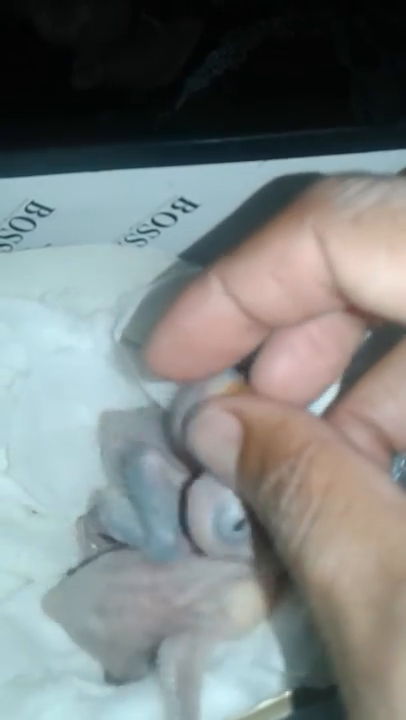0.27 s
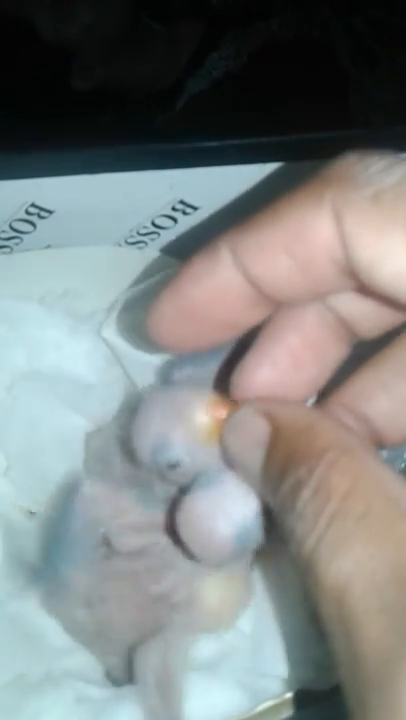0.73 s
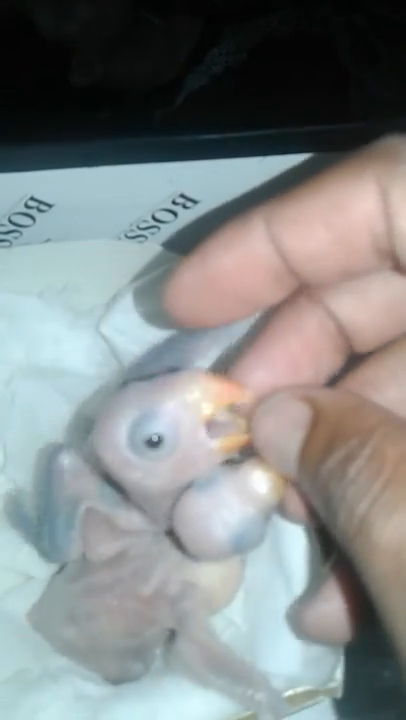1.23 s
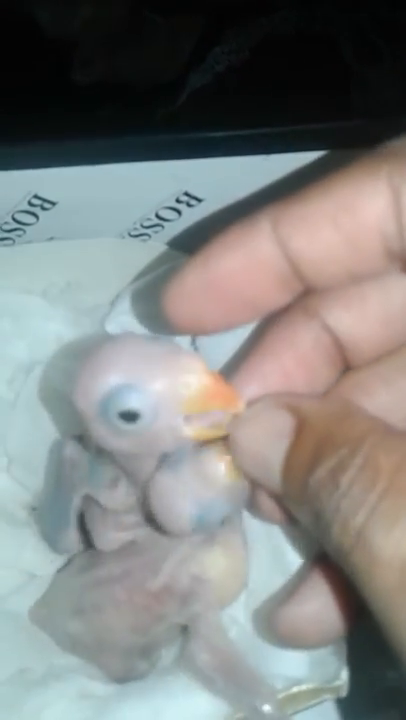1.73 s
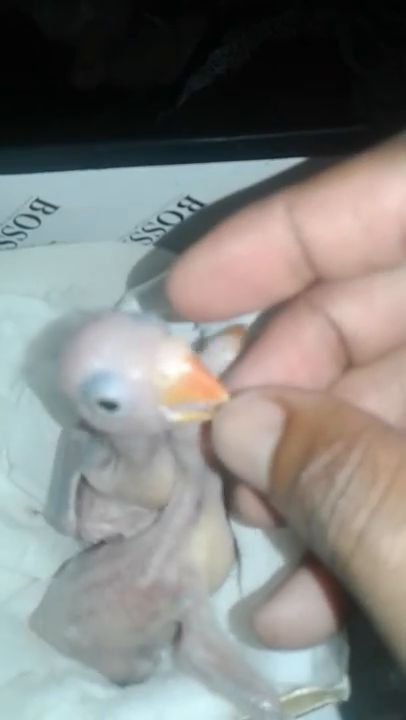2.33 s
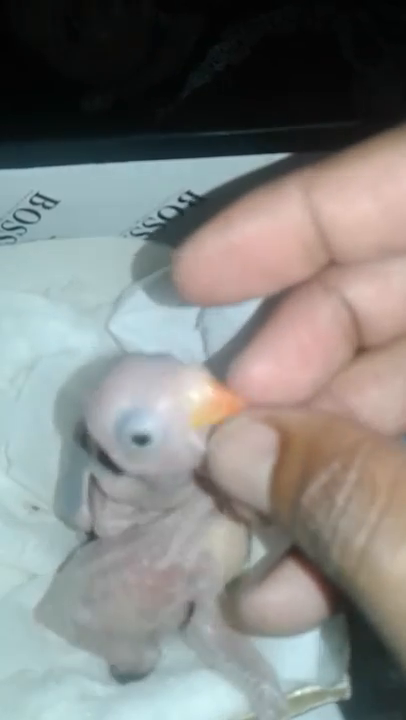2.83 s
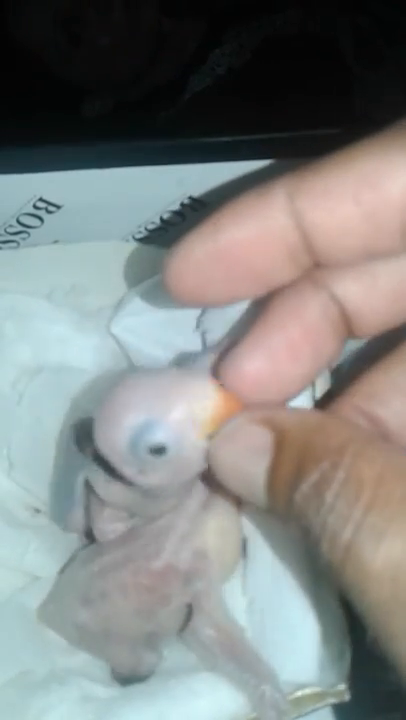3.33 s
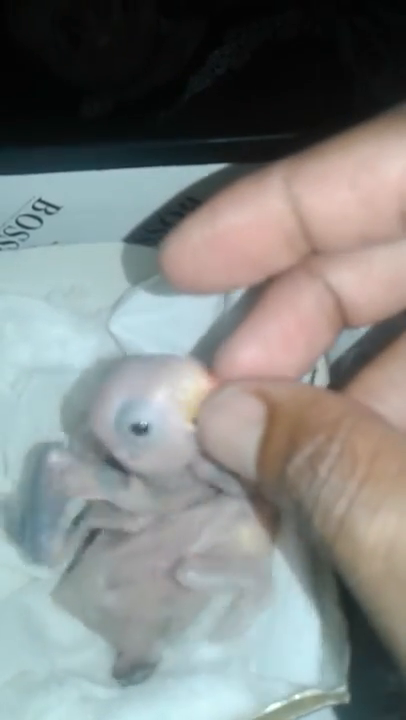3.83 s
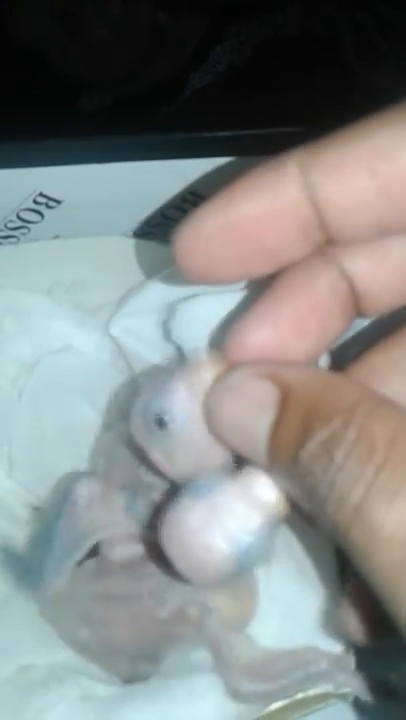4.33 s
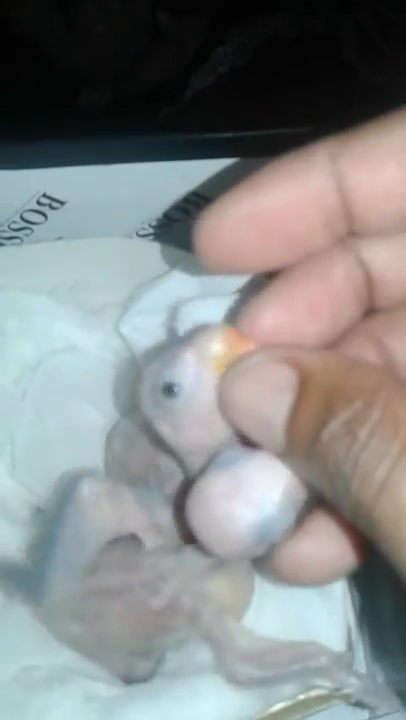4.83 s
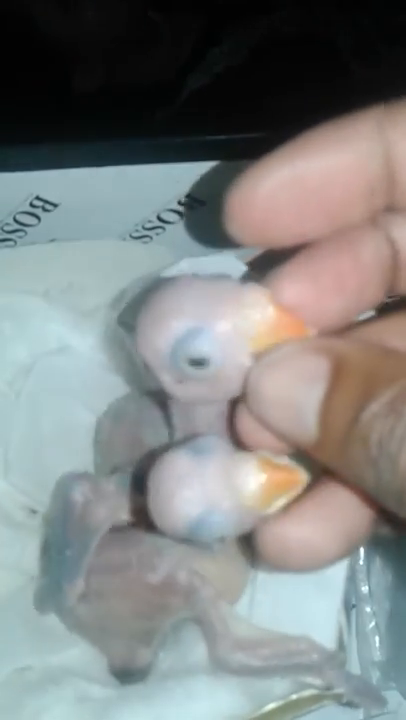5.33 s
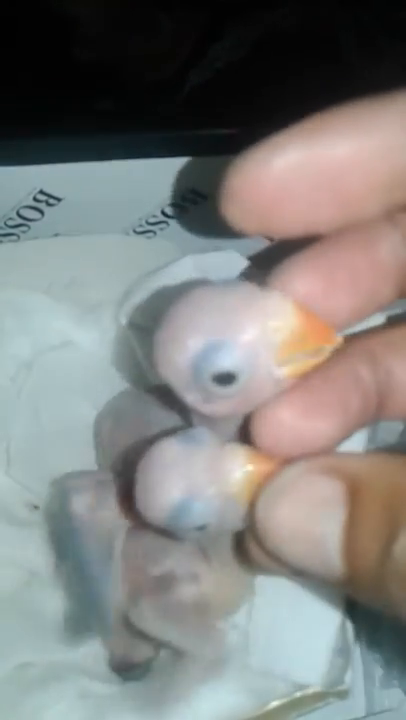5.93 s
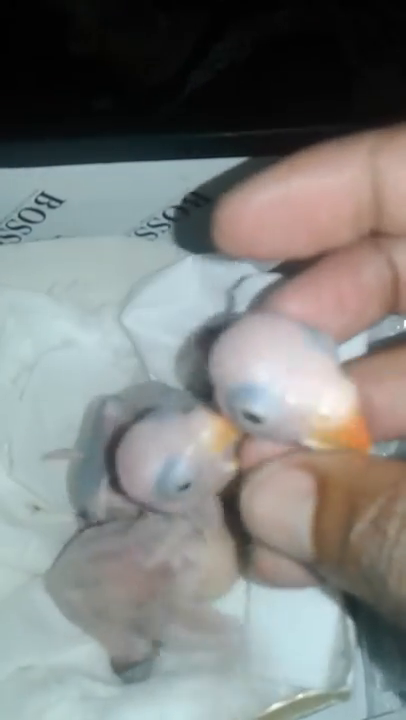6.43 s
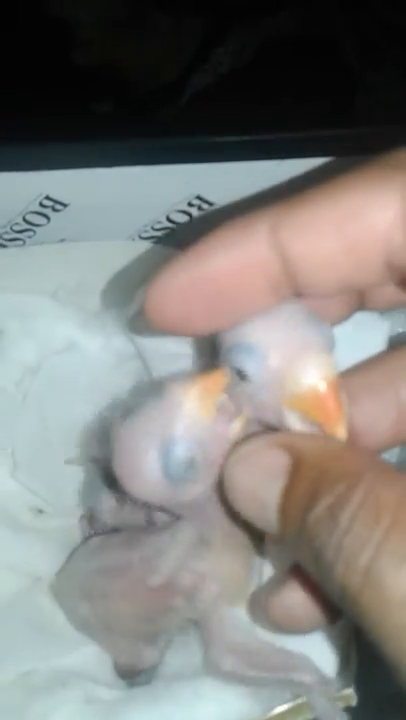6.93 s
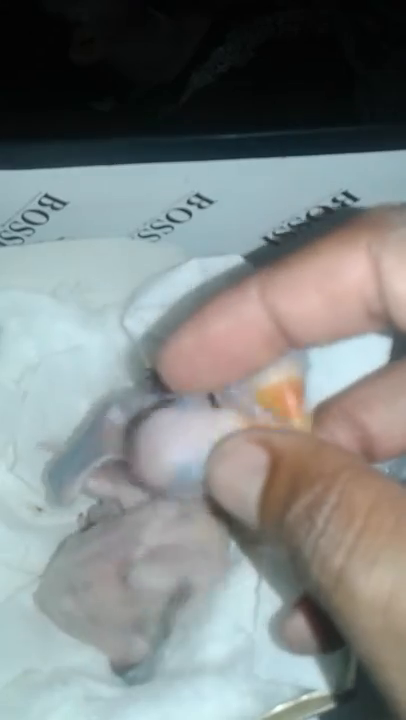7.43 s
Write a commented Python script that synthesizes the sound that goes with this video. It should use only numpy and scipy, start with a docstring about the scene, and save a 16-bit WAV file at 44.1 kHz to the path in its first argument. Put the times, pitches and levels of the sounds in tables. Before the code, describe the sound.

In a room with the low, steady drone and thin hiss of a fan, a baby bird chirps quickly and regularly right by a phone microphone. The chirps are brief and scratchy, dipping a little in loudness midway and sinking slightly in pitch toward the end. A few soft, low handling thumps fall underneath. The chirping stops about a second before the end, leaving only the fan.

```python
"""Parrot chick begging

A chick chirps about six times a second, close to a phone. Each chirp is a click train from the syrinx,
coloured by tract, nest and microphone: the rate arches up and over, then breaks into a slow uneven creak.
A fan drones and hisses in the room; the hand holding the phone bumps it softly."""
import sys
import numpy as np
from scipy import signal
from scipy.fft import rfft, irfft
from scipy.io import wavfile
from scipy.ndimage import uniform_filter1d, map_coordinates

SR = 44100
rng = np.random.default_rng(int(sys.argv[2]) if len(sys.argv) > 2 else 0)


def master(y):
    """Save y as 16-bit WAV."""
    cut = np.clip(np.atleast_2d(y).T, -1, 1)
    pcm = np.round(cut * 32767)  # scale
    wavfile.write(sys.argv[1], SR, pcm.astype(np.int16))


N = 338688

# chirps: t/s, top pitch/Hz, top/ms, creak start/ms, end/ms, hoarseness/0-1,
# mid-rise level/dB, top level/dB, creak level/dB, low-band lift re microphone ring/dB
CHIRPS = [(0.021, 915, 30, 42, 62, .24, -12.3, -14.5, -23, -7.7),
          (0.1662, 942, 32, 39, 73, .3, -13, -11.2, -18.8, -7),
          (0.3194, 897, 27, 40, 71, .27, -12.4, -11.1, -21.6, -9),
          (0.4689, 903, 30, 41, 66, .28, -11.8, -12.2, -20.1, -8),
          (0.6202, 932, 29, 36, 65, .42, -11.7, -11.4, -19.4, -11),
          (0.7669, 918, 32, 37, 70, .36, -12.3, -13.3, -20.5, -9.2),
          (0.9243, 909, 34, 39, 72, .38, -12.2, -12.1, -19.1, -12.3),
          (1.0783, 857, 31, 37, 68, .58, -13.4, -10.4, -17.6, -14),
          (1.2291, 902, 28, 35, 67, .32, -12.2, -11.6, -18, -11.6),
          (1.38, 844, 29, 41, 65, .23, -14.4, -14.4, -22.1, -7.5),
          (1.5397, 839, 26, 38, 58, .18, -13.7, -14, -22.7, -3),
          (1.6963, 862, 27, 36, 63, .37, -14.2, -13.7, -20.9, -5),
          (1.8512, 856, 27, 37, 64, .51, -15.6, -16.2, -21.5, -4.3),
          (2.0101, 846, 28, 43, 60, .34, -14.6, -14.7, -26.1, -4.8),
          (2.168, 818, 27, 35, 58, .39, -14.9, -17.7, -24.4, -4),
          (2.3245, 820, 26, 43, 63, .21, -15.8, -14.2, -23.7, -4),
          (2.479, 857, 29, 43, 63, .29, -13.7, -12.9, -23.5, -5),
          (2.6345, 871, 31, 41, 64, .26, -15.1, -15.6, -26.4, -1.5),
          (2.796, 856, 27, 34, 54, .5, -15, -16.5, -24, -7.5),
          (2.9595, 849, 30, 38, 60, .26, -14.4, -14.6, -23.8, -6.5),
          (3.119, 878, 31, 40, 66, .33, -15, -15.1, -24, -6.2),
          (3.2844, 887, 27, 38, 53, .23, -20, -17.7, -28, -8),
          (3.4449, 884, 35, 44, 75, .44, -16.3, -15.1, -22.3, -6.5),
          (3.6166, 874, 34, 44, 64, .43, -15.2, -15.2, -24, -5),
          (3.7926, 875, 29, 38, 55, .29, -18.5, -18.9, -26.2, -3.7),
          (3.9505, 854, 30, 45, 63, .36, -21.4, -16.3, -25.4, -8),
          (4.1085, 875, 28, 39, 67, .29, -20.2, -16.6, -25.4, -4.2),
          (4.2727, 878, 30, 37, 62, .63, -19.3, -15.9, -21.8, -2.2),
          (4.4357, 857, 20, 40, 49, .27, -18.1, -13, -28, -7.2),
          (4.5796, 895, 31, 40, 66, .45, -15.7, -13.8, -22.2, -5.5),
          (4.7416, 864, 29, 34, 71, .49, -17.4, -12.3, -15.9, -8.5),
          (4.9059, 887, 23, 35, 62, .24, -14.9, -11.9, -18.3, -9),
          (5.0588, 896, 33, 40, 76, .39, -15, -12.7, -18.7, -8),
          (5.2238, 832, 26, 37, 66, .43, -16.5, -14, -18.8, -3),
          (5.3851, 816, 24, 37, 64, .51, -14.6, -12, -16, -6),
          (5.5427, 825, 26, 37, 70, .34, -13.9, -12.4, -19.6, -6.3),
          (5.7078, 833, 29, 38, 68, .46, -14.6, -15.5, -21.2, -4.8),
          (5.866, 821, 28, 36, 68, .4, -14.3, -14.5, -23.3, -3),
          (6.0331, 772, 23, 31, 64, .41, -15.3, -15.4, -20.2, -1.5),
          (6.1959, 778, 28, 41, 67, .27, -15.2, -15, -20.5, -5.5),
          (6.3656, 788, 28, 35, 62, .43, -14.7, -15.9, -16.8, -6.5),
          (6.5307, 778, 29, 41, 61, .3, -12.8, -12.7, -18.2, -10.5),
          (6.6982, 730, 31, 43, 60, .2, -14.1, -16.2, -21.5, -6.8)]
# chirp colour: windpipe, throat and beak resonances, plus the phone microphone's ring near 7.7 kHz
# f/Hz, level/dB, band to lift (0 none, 1 windpipe, 2 valley, 3 throat, 4-7 beak)
CHIRP_COLOUR = [(300, -40, 1), (850, -5, 1), (1250, -9, 1), (1650, 2.2, 1), (2050, -2, 1), (2550, 7.7, 1),
                (3100, -1, 1), (3600, 4.5, 2), (4400, -2, 2), (5400, 6.5, 3), (6200, -6, 0), (7000, -1, 0),
                (7700, 5.5, 0), (8150, 0, 0), (8800, 4.5, 4), (9700, 1, 5), (10600, -3, 5), (12200, 1, 6),
                (13500, -6, 6), (14800, 0, 7), (20000, -8, 7)]
# head and throat movement: t/s, throat peak/Hz, throat re low band/dB, lift/dB near 9, 12 and 15 kHz
HEAD_POSES = [(0, 5500, 6.5, -8, -26, -33), (.4, 5550, 6.5, -3, -21, -37), (.8, 5450, 4, -4, -26, -43),
              (1.24, 5150, 5.5, -6, -16, -33), (1.37, 5000, -1, -11, -24, -17),
              (1.9, 4950, -1, -17, -22, -15), (2.2, 4950, -3, -16, -14, -15),
              (2.64, 5000, 1, -13, -15, -12), (2.78, 5500, -.5, -11, -17, -31),
              (3.3, 5400, -1, -12, -23, -23), (3.9, 5650, 0, -8, -21, -27), (4.4, 5650, -1, -12, -27, -26),
              (4.6, 5450, 3, -15, -18, -33), (4.95, 5450, 3, -15, -29, -33), (5.2, 5600, -1, -18, -20, -23),
              (5.8, 5600, 0, -18, -22, -24), (6.3, 5400, -3, -14, -18, -18),
              (6.7, 5200, -1.5, -11, -22, -33)]
# room decay: f/Hz, T60/s
ROOM_T60 = [(500, .25), (3000, .25), (5000, .35), (8000, .15), (15000, .08)]
# fan levels: t/s, drone/dB, hiss/dB
FAN_LEVELS = [(0.0, -33, -35.6), (1.5, -32.5, -37.6), (2.6, -31, -37), (3.9, -31, -37.6),
              (4.5, -33.5, -37.6), (5.0, -31.5, -37), (6.6, -31.3, -37.3), (7.0, -33.5, -37.6),
              (7.68, -33.5, -37.6)]
# fan drone: f/Hz, relative level/dB
DRONE_SPECTRUM = [(22, -53), (35, -27), (100, -16), (135, -12.5), (180, -13), (260, -3), (340, -1),
                  (450, -2.5), (780, 0), (1050, -5), (1400, -14), (2200, -30), (4000, -90)]
# fan hiss: f/Hz, relative level/dB
HISS_SPECTRUM = [(700, -30), (1300, -2), (2000, 0), (2600, 1), (3200, -7), (4000, -11), (4900, -7.5),
                 (6000, -9), (7650, .5), (8400, -7), (10200, -20), (13000, -26), (15000, -28), (15800, -29)]
# hand bumps: t/s, envelope peak/dB, f/Hz
HAND_BUMPS = [(0.976, -42, 172), (1.599, -34, 151), (1.669, -40, 80.7), (1.739, -39, 86.1),
              (1.799, -34, 183), (1.889, -42, 135), (2.029, -34, 129), (2.209, -39, 61.9),
              (2.243, -28, 130), (2.615, -35, 110), (2.725, -29, 130), (3.339, -45, 83.4),
              (3.758, -40, 78.1), (3.929, -37, 129), (4.081, -34, 199), (4.199, -37, 121),
              (5.699, -41, 78.1)]


def chick(room_db=-20):
    """All chirps plus room reverberation."""
    voice = np.zeros(N + SR)
    for start_s, *gesture, low_db in CHIRPS:
        call = chirp(start_s, gesture, low_db)
        start = round(start_s * SR) - 8
        voice[start:start + len(call)] += call
    reverb = signal.fftconvolve(np.pad(voice, (130, 0)), room_tail())
    return voice[:N] + amp(room_db) * reverb[:N]


def chirp(start_s, gesture, low_db):
    """One call: syrinx through tract, nest and microphone."""
    source = syrinx(*gesture)
    gain = chirp_colour(start_s, low_db)
    echoes = nest_echoes()
    echo_colour = (np.abs(rfft(echoes, 1024)) + .15) ** .8  # divided out: echoes mostly smear
    path = np.convolve(minimum_phase(gain / echo_colour)[:600], echoes)
    return signal.fftconvolve(source, path / np.linalg.norm(path))


def syrinx(top_hz, top_ms, creak_ms, end_ms, hoarseness, rise_db, top_db, creak_db, size=4096):
    """Membrane clicks and breath. A hoarse membrane closes unevenly; in the creak it barely keeps time."""
    ms = np.arange(size) / SR * 1000
    rate_hz = click_rate(ms, top_hz, top_ms, creak_ms, end_ms)
    index = np.arange(80)
    click_ms = np.interp(index, np.cumsum(rate_hz) / SR, ms)
    click_hz = np.interp(click_ms, ms, rate_hz)
    creaking = click_ms > creak_ms
    rough = np.clip(hoarseness - .25, 0, 1)
    sung_jitter = .003 + (.02 + .17 * rough) * rough * np.clip(click_ms / top_ms, 0, 1)
    jitter = np.where(creaking, .13, sung_jitter) * rng.standard_normal(len(index))
    doubling = .35 * rough * (-1) ** index * (click_ms > .6 * top_ms)  # alternate clicks differ
    click_ms += 1000 / click_hz * (jitter + .1 * doubling)
    level_db = click_levels(click_ms, top_ms, creak_ms, end_ms, rise_db, top_db, creak_db)
    level_db += np.where(creaking, 2, .4 + 2 * rough) * rng.standard_normal(len(index)) + 8 * doubling
    heights = amp(level_db) * np.sqrt(SR / click_hz) * (click_ms < end_ms)
    train = impulses(click_ms * SR / 1000 + 8, heights, size)
    soft = np.exp(-(ms / 3.5) ** 2)  # gentle first closures: dull clicks
    train = (1 - .6 * soft) * train + 1.1 * soft * uniform_filter1d(train, size=7)
    air_share = .004 + .22 * rough
    return np.sqrt(1 - air_share) * train + np.sqrt(air_share) * air_puffs(train)


def click_rate(ms, top_hz, top_ms, creak_ms, end_ms, onset_hz=415, sag_hz_per_ms2=.9, creak_hz=(430, 270)):
    """Membrane rate/Hz: parabolic rise and sag, then a slowing creak."""
    rise = top_hz - (top_hz - onset_hz) * (1 - ms / top_ms) ** 2
    sag = top_hz - sag_hz_per_ms2 * (ms - top_ms) ** 2
    creak = np.interp(ms, [creak_ms, end_ms], creak_hz)
    return np.select([ms < top_ms, ms < creak_ms], [rise, sag], creak)


def click_levels(ms, top_ms, creak_ms, end_ms, rise_db, top_db, creak_db, toward_db=-26.5):
    """Chirp envelope/dB: quick onset, sung arch, fading creak."""
    sung_end_db = top_db + .33 * (creak_db - top_db)
    late_db = creak_db + .62 * (toward_db - creak_db)
    knots_ms = [2, 7, top_ms / 2, top_ms, creak_ms - 2.5, creak_ms + 1, end_ms - 9, end_ms]
    knots_db = [rise_db - 6, rise_db - 1.2, rise_db, top_db, sung_end_db, creak_db, late_db, late_db - 7]
    return np.interp(ms, knots_ms, knots_db)


def impulses(positions, heights, size):
    """Clicks at fractional sample positions: windowed sincs."""
    taps = np.floor(positions)[:, None] + np.arange(-7, 9)
    offset = taps - positions[:, None]
    shape = np.sinc(offset) * np.cos(np.pi * offset / 16) ** 2
    return np.bincount(taps.astype(int).ravel(), (heights[:, None] * shape).ravel(), size)[:size]


def air_puffs(train):
    """A bright puff of air after each click."""
    puff = np.exp(-np.arange(100) / 25)
    envelope = np.convolve(np.abs(train), puff / np.linalg.norm(puff))[:len(train)]
    air = envelope * rng.standard_normal(len(train))
    return np.diff(air, prepend=0) / np.sqrt(2)


def chirp_colour(start_s, low_db, scatter_db=2.5, rest_hz=5400):
    """Gain of the bird's resonances and the microphone ring; upper bands follow head and throat."""
    pose_s, *tracks = np.transpose(HEAD_POSES)
    throat_hz, throat_db, db_9k, db_12k, db_15k = (np.interp(start_s, pose_s, v) for v in tracks)
    upper_db = [db_9k - 5, db_12k, db_15k] + scatter_db * rng.standard_normal(3)
    valley_db = -2.6 + .4 * throat_db
    lift_db = np.array([0, low_db, low_db + valley_db, low_db + throat_db, db_9k, *upper_db])
    hz, level_db, band = np.transpose(CHIRP_COLOUR)
    near_throat = (hz > .75 * rest_hz) & (hz < 1.2 * rest_hz)  # peak and adjacent dips move together
    hz = np.where(near_throat, hz * throat_hz / rest_hz, hz)
    return amp(log_interp(hz, level_db + lift_db[band.astype(int)], np.fft.rfftfreq(1024, 1 / SR)))


def minimum_phase(gain, size=1024):
    """Unit-energy minimum-phase response, by cepstral folding."""
    cepstrum = irfft(np.log(gain), size)
    cepstrum[1:size // 2] *= 2
    cepstrum[size // 2 + 1:] = 0
    response = irfft(np.exp(rfft(cepstrum)), size)
    return response / np.linalg.norm(response)


def nest_echoes(echo_db=-10, fade_ms=1.5, size=256):
    """Echoes off hand and nest, centimetres from the beak; new per chirp as the head moves."""
    ms = np.arange(size) / SR * 1000
    response = amp(echo_db) * rng.standard_normal(size) * np.exp(-ms / fade_ms)
    response[0] = 1  # direct sound
    return response


def room_tail():
    """Room response; each frequency decays at its own rate."""
    hz, t, spectra = signal.stft(rng.standard_normal(SR // 3), SR, nperseg=256)
    t60_s = log_interp(*np.transpose(ROOM_T60), hz)[:, None]
    tail = signal.istft(spectra * amp(-60 * t / t60_s), SR, nperseg=256)[1]
    return tail / np.linalg.norm(tail)


def fan():
    """Low drone of moving air and a thin hiss."""
    knots_s, drone_db, hiss_db = np.transpose(FAN_LEVELS)
    t = np.arange(N) / SR
    drone_gain = amp(np.interp(t, knots_s, drone_db) + .4 * wobble(rate_hz=5))
    drone = drone_gain * air_noise(DRONE_SPECTRUM, patchy_db=1.1)
    hiss = amp(np.interp(t, knots_s, hiss_db)) * air_noise(HISS_SPECTRUM, patchy_db=.8)
    return drone + hiss


def air_noise(spectrum, patchy_db):
    """Coloured noise, rms 1, with time-frequency patches of random gain."""
    spectra = signal.stft(rng.standard_normal(N), nperseg=512)[2]
    patches = uniform_filter1d(rng.standard_normal(spectra.shape), size=6, axis=0)
    patches = uniform_filter1d(patches, size=12, axis=1)
    noise = signal.istft(spectra * amp(patchy_db * unit_rms(patches)), nperseg=512)[1][:N]
    colour = amp(log_interp(*np.transpose(spectrum), np.fft.rfftfreq(N, 1 / SR)))
    return unit_rms(irfft(rfft(noise) * colour, N))


def hand_bumps(rise_cycles=2.6 / 3):
    """Soft low thumps of the hand on the case."""
    out = np.zeros(N + SR)
    t = np.arange(SR // 4) / SR
    for start_s, peak_db, hz in HAND_BUMPS:
        age = t * hz / rise_cycles
        envelope = amp(peak_db) * age * np.exp(1 - age)
        out[round(start_s * SR):][:len(t)] += envelope * np.sin(2 * np.pi * hz * t)
    return out[:N]


def wobble(rate_hz):
    """Smooth random curve."""
    knots = rng.standard_normal(int(N * rate_hz / SR) + 4)
    return map_coordinates(knots, [np.arange(N) * rate_hz / SR])


def amp(db):
    """dB to gain."""
    return 10 ** (np.asarray(db) / 20)


def unit_rms(x):
    """Scale to rms 1."""
    return x / np.sqrt(np.mean(x ** 2) + 1e-20)


def log_interp(knots_hz, values, hz):
    """Interpolate over log frequency."""
    return np.interp(np.log(hz + 1), np.log(np.asarray(knots_hz) + 1), values)


def scene():
    """Chick, fan and handling; mono."""
    return (chick() + fan() + hand_bumps())[None]


def record(dry, ceiling=.95, hardness=5, cutoff_hz=15850):
    """Phone: soft clip, then band limit."""
    clipped = dry / (1 + np.abs(dry / ceiling) ** hardness) ** (1 / hardness)
    return irfft(rfft(clipped) * (np.fft.rfftfreq(N, 1 / SR) < cutoff_hz), N)


dry = scene()
out = record(dry)
master(out)
```